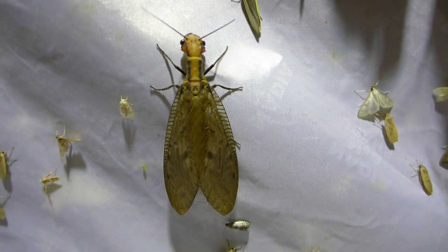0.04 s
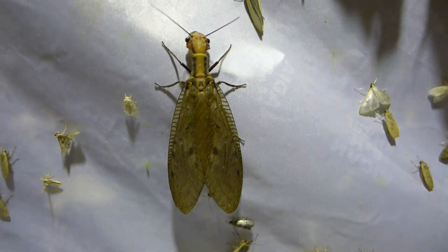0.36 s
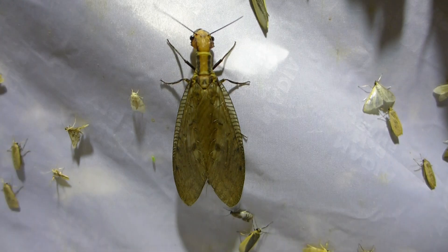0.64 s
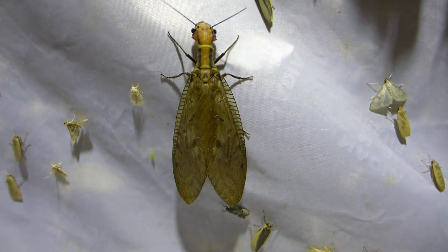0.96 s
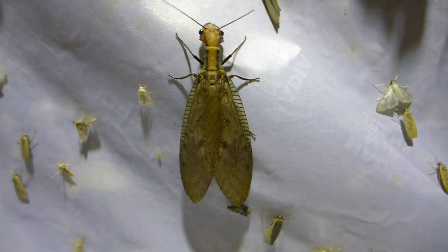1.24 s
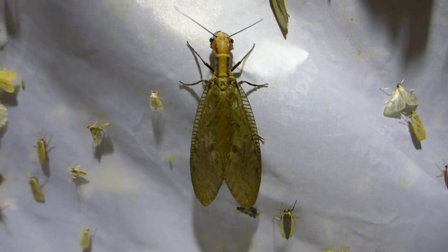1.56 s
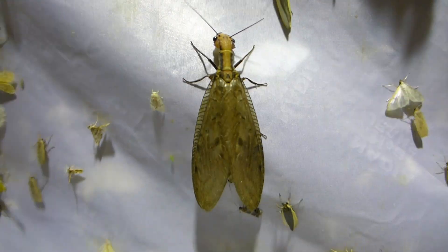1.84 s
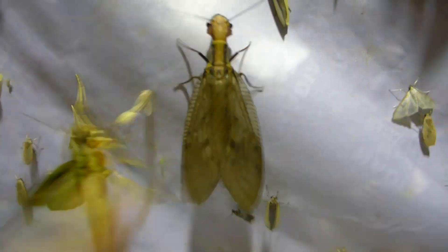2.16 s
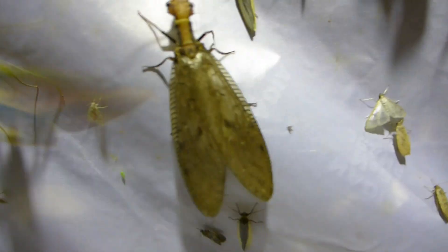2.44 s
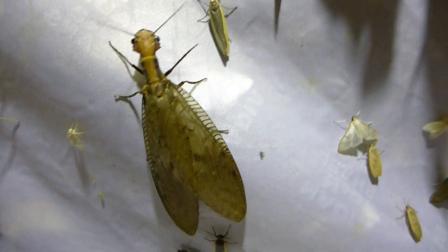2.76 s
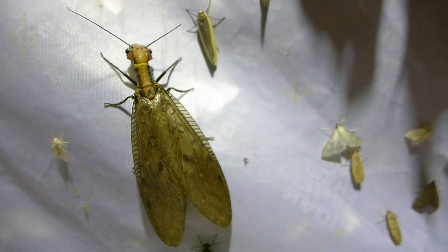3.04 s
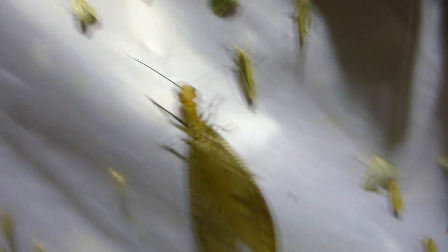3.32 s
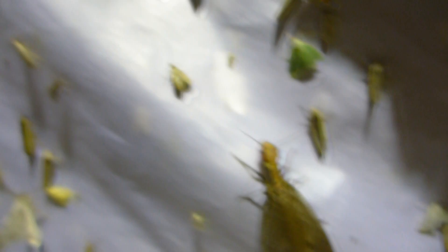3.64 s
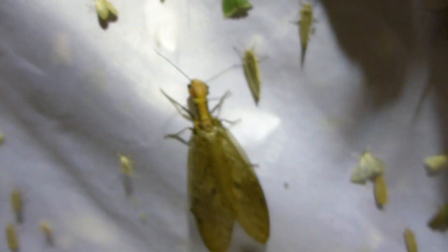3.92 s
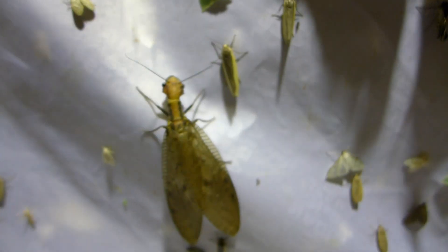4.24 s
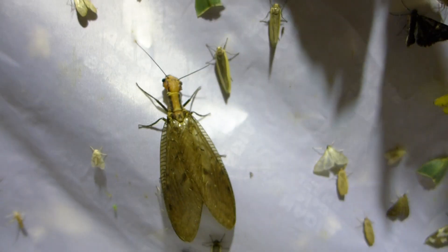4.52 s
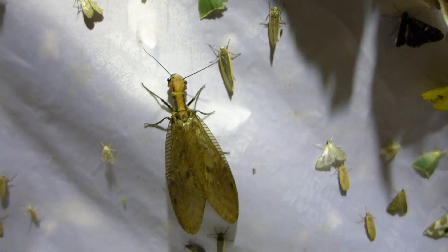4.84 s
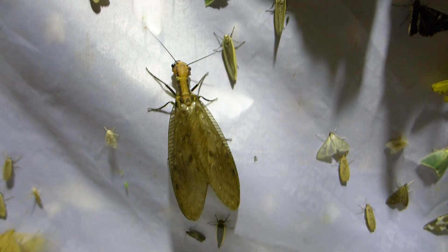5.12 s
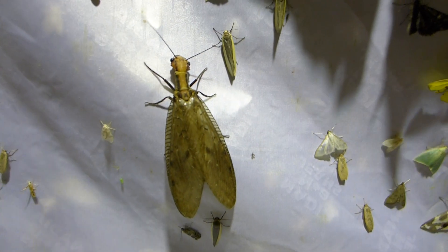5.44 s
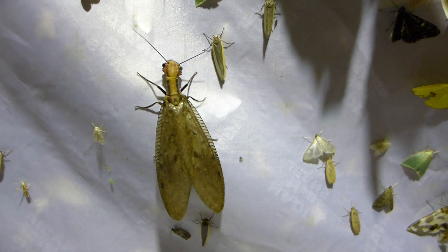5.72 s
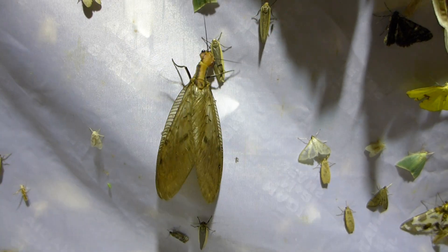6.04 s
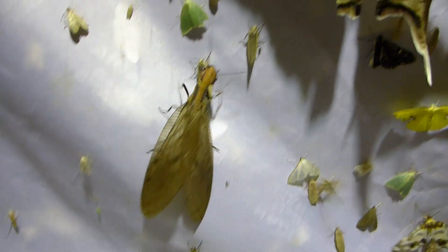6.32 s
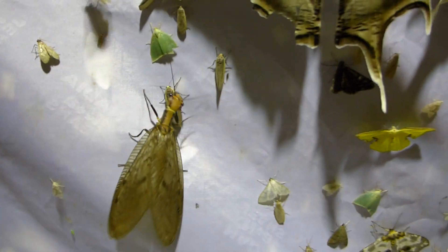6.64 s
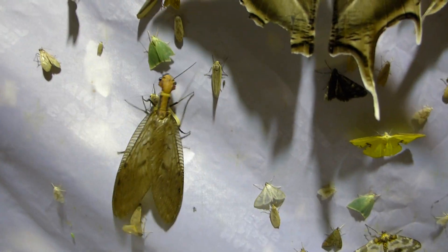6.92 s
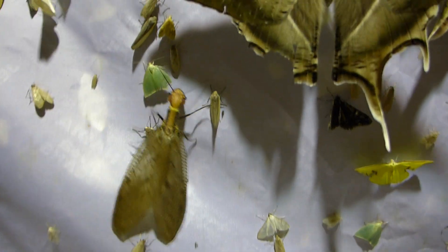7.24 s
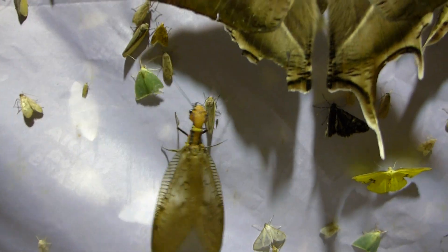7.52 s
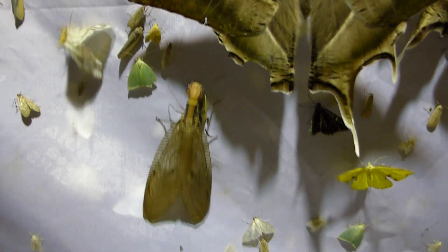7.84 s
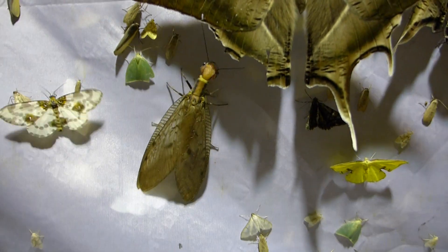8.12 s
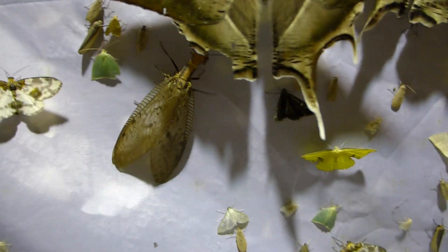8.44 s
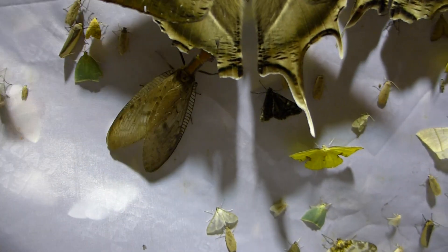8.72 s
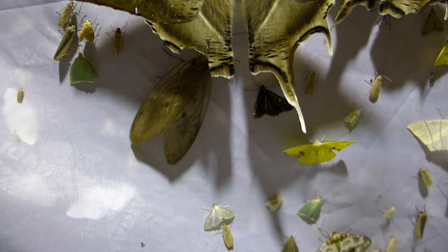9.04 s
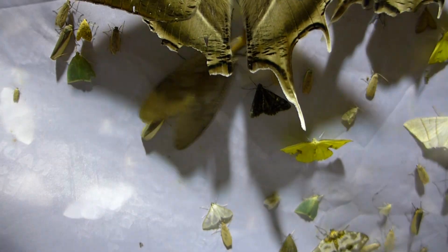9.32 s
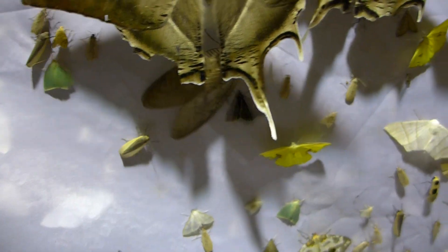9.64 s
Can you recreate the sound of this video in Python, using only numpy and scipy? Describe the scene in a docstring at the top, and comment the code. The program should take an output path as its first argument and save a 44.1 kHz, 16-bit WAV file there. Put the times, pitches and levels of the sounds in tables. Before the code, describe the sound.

Insects crawl and flutter on a cloth sheet outdoors at night, close to the microphone. Quiet dry ticks, scratchy rustles and soft thuds come irregularly while big moths whirr past with a low throb. About a third of the way in, wings buffet the microphone in a loud, slightly overloaded burst, and a softer one comes near the end. Faint hiss and distant insects lie underneath.

```python
"""Insects on a lit sheet

Insects crowd a cloth sheet at night, close to a microphone. Legs and wings scratch and tick by friction
and impact, bodies bump the damped cloth and scrabble for a hold, and big moths whirr past on periodic
wingbeats. Twice a moth's wings buffet the microphone ports with jets of air; the harder pass overloads
the recorder, whose gain ducks and creeps back over faint hiss, a far chorus and a thin whine."""
import sys
import numpy as np
from scipy import signal
from scipy.fft import rfft, irfft, next_fast_len
from scipy.io import wavfile
from scipy.ndimage import uniform_filter1d, map_coordinates

SR = 44100
rng = np.random.default_rng(int(sys.argv[2]) if len(sys.argv) > 2 else 0)


def wav_out(sig):
    """Save sig, one row per channel (or a flat mono array), as 16-bit PCM at SR to the path in sys.argv[1]."""
    wavfile.write(sys.argv[1], SR, np.round(np.clip(np.atleast_2d(sig).T, -1, 1) * 32767).astype(np.int16))


N = 430857
TIME_S = np.arange(N) / SR
EVENT_S = np.arange(-512, 1536) / SR  # time around the peak of a short event


def amp(db):
    """Amplitude ratio of a level in decibels."""
    return 10 ** (np.asarray(db) / 20)


def unit(x):
    """Normalisation to rms 1."""
    return x / np.sqrt(np.mean(x ** 2) + 1e-20)


def along(points, hz):
    """Interpolation on a logarithmic frequency axis."""
    f, values = np.transpose(points)
    return np.interp(np.log(hz + 1), np.log(f), values)


def wobble(rate_hz):
    """Slow random modulation: a spline through Gaussian knots."""
    coarse = np.arange(0, N, 128)
    knots = rng.standard_normal(int(N * rate_hz / SR) + 4)
    return np.interp(np.arange(N), coarse, map_coordinates(knots, [coarse * rate_hz / SR]))


def filtered(x, response):
    """Linear filtering: the spectrum times a frequency response."""
    n = x.shape[-1]
    padded = next_fast_len(n + n // 10)
    return irfft(rfft(x, padded) * response(np.fft.rfftfreq(padded, 1 / SR)), padded)[..., :n]


def noise(size, gain, correlation):
    """Partly coherent stereo noise of rms 1; gain and correlation are functions of frequency."""
    def mid_and_side(f):
        common = (1 + np.clip(correlation(f), -1, 1)) / 2  # share of power common to both ports
        return gain(f) * np.sqrt(np.reshape([common, 1 - common], (2, -1)))
    mid, side = filtered(rng.standard_normal((2, size)), mid_and_side)
    return unit(np.array([mid + side, mid - side]))


def swell(t, rise, decay):
    """Exponential growth and decay about a peak at t = 0."""
    return np.exp(-np.abs(t) / np.where(t < 0, rise, decay))


def add(out, peak_s, sound, level_db, pan_db):
    """Superpose an event; its level is its energy spread over 5 ms, its pan is left minus right."""
    ports = unit(amp([[pan_db / 2], [-pan_db / 2]]))
    sound = sound / np.linalg.norm(sound, axis=1, keepdims=True)
    sound = sound * ports * amp(level_db) * np.sqrt(.005 * SR)
    at = round(peak_s * SR) + np.round(EVENT_S * SR).astype(int)
    inside = (at >= 0) & (at < N)
    out[:, at[inside]] += sound[:, inside]


# Spectrum of the noise floor: frequency_hz, relative_db
HISS_SPECTRUM = [(40, -6), (80, -13), (190, -1), (340, -4.5), (700, -2.5), (1200, -2.5), (2200, -12),
                 (3300, -17.5), (4900, -12), (11000, -18), (14000, -23), (16000, -37)]
# Likeness of the hiss at the two ports: frequency_hz, correlation
HISS_CORRELATION = [(130, 0.61), (290, 0.77), (640, -0.66), (1400, -0.88), (3100, -0.087), (7000, 0.42)]


def hiss():
    """Stationary broadband noise forms a faint floor."""
    return amp(-55.5) * noise(N, lambda f: amp(along(HISS_SPECTRUM, f)),
                              lambda f: along(HISS_CORRELATION, f))


def chorus():
    """Far insects sum incoherently into two narrow, wavering bands of noise."""
    spectrum = [(3600, -25), (4200, -7), (4550, -22), (4980, -3), (5400, -26), (6200, -52)]
    bands = noise(N, lambda f: amp(along(spectrum, f)), lambda f: .3)
    return amp(-69.5 + wobble(11) + 1.2 * wobble(2.1)) * bands


def whine(pitch_hz=15625):
    """A thin electronic pure tone with slight amplitude modulation."""
    return amp(-79 + 1.8 * wobble(6.5)) * np.sin(2 * np.pi * pitch_hz * TIME_S)


# Moths flying past the microphone: closest_s, level_db, passing_time_s
FLYBYS = [(1.35, -57, 0.26), (2.09, -42, 0.1), (2.56, -52.5, 0.14), (3.28, -53.5, 0.094), (3.77, -30, 0.1),
          (4.01, -32, 0.031), (4.17, -45, .36), (5.93, -55.5, 0.028), (7.86, -50.5, 0.033),
          (8.918, -36.5, 0.038)]


def flyby_envelope(falloff=1.88):
    """Near-field spreading: wing sound falls as a power of distance along straight flight paths."""
    return np.sqrt(sum(amp(level_db) ** 2 / (1 + ((TIME_S - closest_s) / passing_s) ** 2) ** falloff
                       for closest_s, level_db, passing_s in FLYBYS))


def moth(beat_hz, body_hz, width_hz):
    """Source and filter: each uneven wingbeat excites a broad resonance, a soft low throb."""
    def throb(f):
        return (1j * f * width_hz / (body_hz ** 2 - f ** 2 + 1j * f * width_hz)) ** 2
    cycles = np.cumsum(beat_hz * amp(1.3 * wobble(14))) / SR
    beats = np.diff(np.floor(cycles), prepend=0)
    return unit(filtered(beats * amp(2.55 * wobble(25)), throb))


def whirr(nearness):
    """Two big moths' wingbeats superpose, louder as they come near."""
    fast = moth(beat_hz=42.08, body_hz=145.4, width_hz=132)
    slow = moth(beat_hz=33.32, body_hz=147, width_hz=154)
    return nearness * unit(fast + 0.89 * slow)


# Wings brushing the sheet: peak_s, half_length_s, scratch_db, patter_db
WING_FLURRIES = [(0.188, .055, -54, -58.5), (0.6, 0.17, -61, -62), (0.819, 0.021, -54, -53.5),
                 (1.11, 0.071, -57.5, -57), (1.303, .07, -57, -56), (1.487, 0.045, -57, -72),
                 (1.808, 0.031, -46, -44), (2.038, .05, -50.5, -42.5), (2.166, 0.023, -36, -37),
                 (2.193, 0.075, -52, -47), (2.726, 0.092, -56, -63), (2.982, 0.035, -53, -51.5),
                 (3.286, 0.091, -61, -53), (3.556, 0.08, -54.5, -48), (3.901, 0.082, -54, -45),
                 (4.3, 0.35, -57, -54), (5.06, 0.021, -57.5, -55.5), (5.21, 0.068, -57.5, -55.5),
                 (6.105, 0.058, -64, -64), (6.37, .03, -56, -71), (6.687, 0.013, -53, -54.5),
                 (6.799, 0.022, -53, -63), (6.898, 0.035, -63, -54), (7.06, 0.018, -54, -57),
                 (7.33, 0.36, -64, -61), (7.66, .08, -62, -52), (7.822, 0.049, -57, -53),
                 (8.277, 0.13, -58.5, -63), (8.697, 0.023, -52, -53), (8.82, 0.087, -59, -56.5),
                 (9.134, 0.056, -51.5, -62), (9.73, 0.061, -59.5, -75)]


def brushing_power(scrabble_db=-22.5, scrabble_s=0.093):
    """Incoherent powers add, for scratch and patter: wing flurries, and a scrabble after each thud."""
    t, power = TIME_S[::64], 0
    for peak_s, half_s, scratch_db, patter_db in WING_FLURRIES:
        power += amp([[scratch_db], [patter_db]]) ** 2 * np.exp(-((t - peak_s) / half_s) ** 2)
    for peak_s, level_db, _, _ in THUDS:
        fade = (t > peak_s) * np.exp(-np.abs(t - peak_s) / scrabble_s)
        power += amp(level_db + scrabble_db) ** 2 * fade
    return [np.interp(TIME_S, t, row) for row in power]


def touches(rate_hz, life_s, spread_db=6):
    """A Poisson train of contacts gives two envelopes: a brief scratch and a pat three times as long."""
    sizes = (rng.random(N) < rate_hz / SR) * amp(spread_db * np.clip(rng.standard_normal(N), -2, 2))
    poles = [np.exp(-1 / (stretch * life_s * SR)) for stretch in (1, 3)]
    return [unit(np.sqrt(signal.lfilter([1], [1, -pole], sizes ** 2))) for pole in poles]


# Spectrum of dry scratches and snaps: frequency_hz, relative_db
SCRATCH_SPECTRUM = [(500, -1.5), (1500, -2.5), (2400, 0), (3200, -7), (4200, 0), (5100, 3), (6000, -1),
                    (8000, -0.5), (12000, -7), (16000, -21)]
# Spectrum of the patted cloth: frequency_hz, relative_db
PATTER_SPECTRUM = [(50, -39), (150, -5), (350, 0.5), (650, -3.5), (1100, -8.5), (2200, -14), (5000, -26.5)]


def crawl(nearness):
    """Friction and tiny impacts: feet and wings scratch and pat the cloth; moths' draughts stir it."""
    step_scratch, step_pat = touches(rate_hz=60, life_s=0.00088)
    brush_scratch, brush_pat = touches(rate_hz=650, life_s=0.0009)
    scratch_power, patter_power = brushing_power()
    draught = amp(-56.5) * (nearness / amp(-50)) ** 0.3
    scratching = (amp(-64) * step_scratch) ** 2 + scratch_power * brush_scratch ** 2
    pattering = (amp(-63.5) * unit(step_pat ** 0.38)) ** 2  # the soft cloth evens out the pats
    pattering += (patter_power + draught ** 2) * brush_pat ** 2
    scratch = np.sqrt(scratching) * noise(N, lambda f: amp(along(SCRATCH_SPECTRUM, f)), lambda f: .72)
    patter = np.sqrt(pattering) * noise(N, lambda f: amp(along(PATTER_SPECTRUM, f)), lambda f: .6)
    return scratch + patter


def tick(life_s, bright_db):
    """A brief contact is broadband: tiny snaps, then a faint, short tail of scattered reflections."""
    def colour(f):
        return amp(along(SCRATCH_SPECTRUM, f) + bright_db * along([(3500, -1.4), (10000, 1.0)], f))
    snaps = amp(1.9 * unit(uniform_filter1d(rng.standard_normal(len(EVENT_S)), size=14)))
    tail = 0.13 * swell(EVENT_S, 0.0012, 0.0089)
    envelope = swell(EVENT_S, life_s / 2, life_s) * snaps + tail
    return envelope * noise(len(EVENT_S), colour, lambda f: .82)


# Dry contacts of wings and legs: peak_s, level_db, life_s, brightness_db, pan_db
CONTACTS = [(0.051, -47, 0.0022, 0, -3), (0.1217, -37.5, 0.00046, -3.5, 0), (0.146, -47, 0.00046, 3, -1),
            (0.1572, -44.5, 0.0011, 7, -1), (0.5287, -38, 0.00067, 7.5, -1), (0.7924, -43.5, 0.0042, 0, -3),
            (0.988, -42, 0.00044, 12, -5), (1.0828, -39.5, .0012, 1, -1), (1.0896, -41.5, 0.0012, 0.5, -1),
            (1.7981, -34.5, 0.00042, -2.5, 3), (1.8147, -38, 0.00056, -7, 1),
            (2.1417, -34.5, .0005, -0.5, 4), (2.1577, -28.5, 0.00026, 4, 2),
            (2.3041, -38.5, 0.0033, -5.5, 1), (2.4167, -41.5, 0.0035, 0, 4), (2.4671, -41, 0.00021, 0, 6),
            (2.5758, -39.5, 0.00031, 1.5, 3), (3.0541, -36, 0.0023, 3.5, 0), (3.07, -46, 0.00064, -1, 5),
            (3.4665, -35, 0.00048, 0.5, 9), (3.4703, -29.5, 0.00044, 1.5, 5),
            (3.4829, -37.5, 0.0007, -4, 5), (3.5012, -39, .0011, -1.5, 5), (3.6086, -28, 0.0013, 0.5, -1),
            (3.6129, -22, 0.0008, 0, -1.5), (3.8414, -34, 0.00026, -1, 0), (4.1018, -36, .0003, 0.5, 3),
            (4.2909, -33, 0.00089, -1, -8), (4.3029, -31, 0.0018, -2, -6), (4.5277, -40, .0004, -3.5, -6),
            (4.5835, -43.5, .0004, -1.5, -10), (4.8469, -41.5, 0.0014, -4.5, -13),
            (5.1494, -49, 0.00044, 5, 6), (5.6608, -39.5, .0011, 1.5, -6), (5.6742, -43.5, 0.00066, -1, -4),
            (7.583, -41, 0.0016, 3, 0), (7.6737, -44, 0.00044, 3, -1), (8.4306, -42.5, 0.00028, -5, -6),
            (8.6651, -40, 0.0012, 0, -1), (8.6785, -34.5, 0.00076, -3, 2), (8.8017, -41.5, 0.00084, 0, -1),
            (8.8996, -25, 0.00086, -1.5, -2), (8.925, -27.5, 0.0011, -1, -11),
            (8.9931, -46, 0.0014, 0, 1.5), (9.0437, -41, 0.00066, 0.5, -5), (9.092, -46, .0005, 1, -10),
            (9.0995, -42, 0.00041, 0, -11)]


def ticks():
    """Impulsive excitation: wings and legs snap against the sheet."""
    out = np.zeros((2, N))
    for peak_s, level_db, life_s, bright_db, pan_db in CONTACTS:
        add(out, peak_s, tick(life_s, bright_db), level_db, pan_db)
    return out


def push(hz, eddies, rise, decay, sag, dull, wake, correlation=1.0):
    """A shove of air: a damped swing sagging in pitch, with eddies and a wake; rise, decay in cycles."""
    cycles = EVENT_S * hz
    phase = 2 * np.pi * (cycles - sag * cycles * np.tanh(cycles / 2) / 2) + rng.uniform(0, 2 * np.pi)
    offset = np.arccos(np.clip(correlation, -1, 1)) / 2  # puts the ports out of step
    swing = np.sin(phase + np.array([[offset], [-offset]]))
    swirl = noise(len(cycles), lambda f: (f / hz) / (1 + (f / hz) ** 2) ** dull, lambda f: correlation)
    shove = swell(cycles, rise, decay) * (swing + eddies * swirl)
    return shove + wake * swell(cycles, 0.41, 19.0) * swirl


# Soft thuds: bodies landing on the cloth, and a couple of light wing puffs on the microphone:
# peak_s, level_db, pitch_hz, pan_db
THUDS = [(0.0544, -36.5, 654, 3), (0.1213, -36, 754, 0), (0.856, -41.5, 537, -4), (0.9625, -42, 576, -2),
         (1.4876, -47, 563, 0), (1.6924, -41.5, 550, -2), (1.765, -42.5, 890, 0), (1.7809, -36, 342, 0),
         (1.7996, -34, 770, 1), (1.899, -40.5, 770, 1), (2.1054, -35, 348, 14), (2.1634, -27, 470, 0),
         (2.2154, -36.5, 410, 0), (2.4714, -41.5, 454, 0), (2.8962, -43.5, 383, -1),
         (3.1563, -41.5, 1120, 7), (3.2653, -39.5, 610, 3), (4.7929, -34, 433, -2.5),
         (4.9775, -32.5, 600, 2.5), (5.351, -38, 720, -2), (5.597, -41.5, 860, 4), (6.0894, -47.5, 825, 1),
         (6.3216, -48, 650, 1), (6.354, -46.5, 790, 1), (6.3914, -44.5, 483, -1), (7.2564, -48, 510, 2),
         (7.4194, -48.5, 527, 2), (7.586, -45.5, 780, 3), (7.6627, -47.5, 930, 1), (7.7788, -39, 980, 4),
         (7.8384, -41, 784, 12), (8.209, -45.5, 390, 0), (8.666, -44, 450, -2), (9.092, -46.5, 350, -4),
         (9.3965, -42, 593, -3)]


def thuds():
    """Heavily damped oscillation: a thud, click and low sway, as when a hard shell lands on cloth."""
    out = np.zeros((2, N))
    for peak_s, level_db, pitch_hz, pan_db in THUDS:
        thud = push(pitch_hz, eddies=0.59, rise=0.3, decay=1.0, sag=0.98, dull=1.6, wake=0.12)
        click = tick(life_s=0.00074, bright_db=-3)
        sway = push(hz=188, eddies=0.48, rise=0.24, decay=0.9, sag=.2, dull=2.0, wake=0.045)
        add(out, peak_s, thud, level_db, pan_db)
        add(out, peak_s, click, level_db - 6.5, pan_db)
        add(out, peak_s, sway, -49 + 0.5 * (level_db + 40), pan_db)  # grows half as fast as the thud
    return out


# Wing strokes blowing on the microphone: peak_s, level_db, pitch_hz, pan_db
WING_STROKES = [(3.6025, -27, 198, 0), (3.6582, -7, 515, 4.5), (3.661, -6, 470, 7.5), (3.663, -9, 170, 2),
                (3.68, -4.5, 555, 4.5), (3.6834, -4, 180, -0.5), (3.7394, -16.5, 160, -1),
                (3.7715, -23, 388, 3), (3.7968, -16.5, 179, -10), (3.8312, -17.5, 179, -1),
                (4.002, -17, 293, -28), (4.0085, -17.5, 249, -6), (4.0185, -19, 180, 16),
                (7.8915, -35.5, 262, 12), (8.9004, -16, 490, -6), (8.9088, -26, 280, 1),
                (8.9274, -19, 324, -6), (8.9409, -21.5, 306, -17)]
# Likeness of a jet at the two ports, which small eddies hit separately: pitch_hz, correlation
JET_CORRELATION = [(200, 0.74), (330, 0.85), (550, -0.7)]


def puffs(swing_hz=147):
    """Turbulent buffeting: each close wing stroke blows a jet at the ports, on a slow pressure swing."""
    out = np.zeros((2, N))
    pressure = 0.21 * np.sin(2 * np.pi * swing_hz * EVENT_S) * swell(EVENT_S, 0.00078, 0.014)
    for peak_s, level_db, pitch_hz, pan_db in WING_STROKES:
        dull = 1.54 - level_db / 30  # the harder the stroke, the finer its eddies
        jet = push(pitch_hz, eddies=.85, rise=.2, decay=.6, sag=.35, dull=dull, wake=.04,
                   correlation=along(JET_CORRELATION, pitch_hz))
        add(out, peak_s, jet + pressure, level_db, pan_db)
    return out


def high_pass(x, cutoff_hz):
    """A second-order high-pass rejects slow pressure changes."""
    return signal.sosfilt(signal.butter(2, cutoff_hz, "high", fs=SR, output="sos"), x)


def scene():
    """Superposition: the sources add together, close and in the open air."""
    nearness = flyby_envelope()
    snaps = ticks()
    air = high_pass(thuds() + puffs() + whirr(nearness), cutoff_hz=85)  # the ports leak slow pressure
    return snaps + air + crawl(nearness) + hiss() + chorus() + whine()


def gain_control(x, threshold_db, attack_s, release_s):
    """Compression: peaks over the threshold turn the gain down, and it recovers slowly."""
    over_db = np.maximum(20 * np.log10(np.abs(x).max(axis=0) + 1e-9) - threshold_db, 0)
    fade = np.exp(-TIME_S / release_s)
    held_db = np.maximum.accumulate(over_db / fade) * fade
    pole = np.exp(-1 / (attack_s * SR))
    return x * amp(-signal.lfilter([1 - pole], [1, -pole], held_db))


def record(dry, top_hz=15800):
    """Limited headroom and bandwidth: bass cut, gain control, clipping and a steep low-pass."""
    ducked = gain_control(high_pass(dry, cutoff_hz=65), threshold_db=-6, attack_s=.022, release_s=.85)
    return filtered(np.clip(ducked, -1, 1), lambda f: 1 / np.sqrt(1 + (f / top_hz) ** 160))


dry = scene()
out = record(dry)
wav_out(out)
```